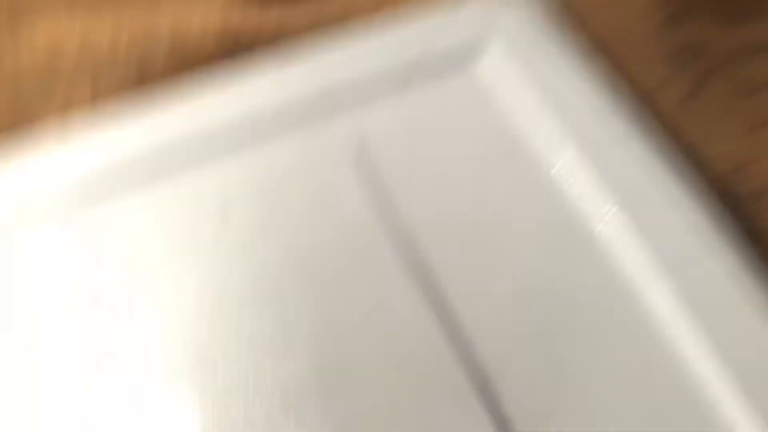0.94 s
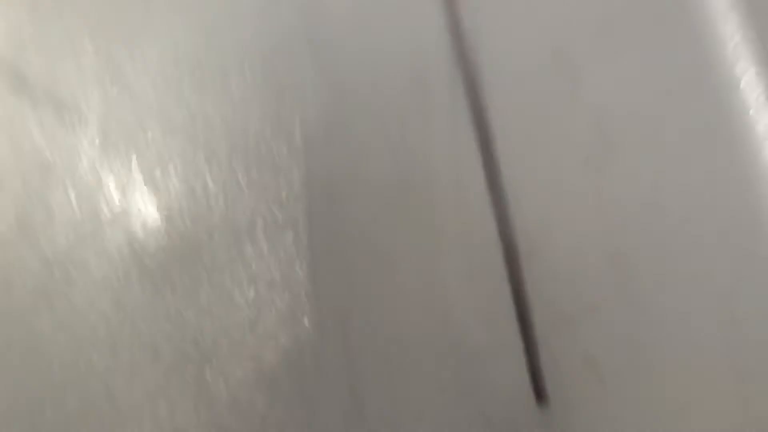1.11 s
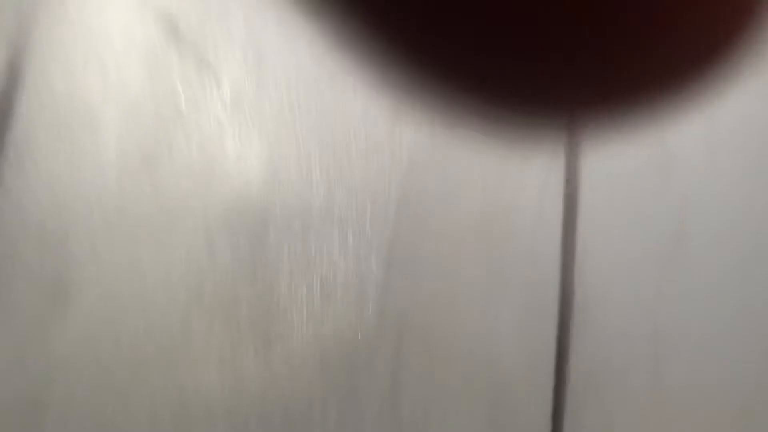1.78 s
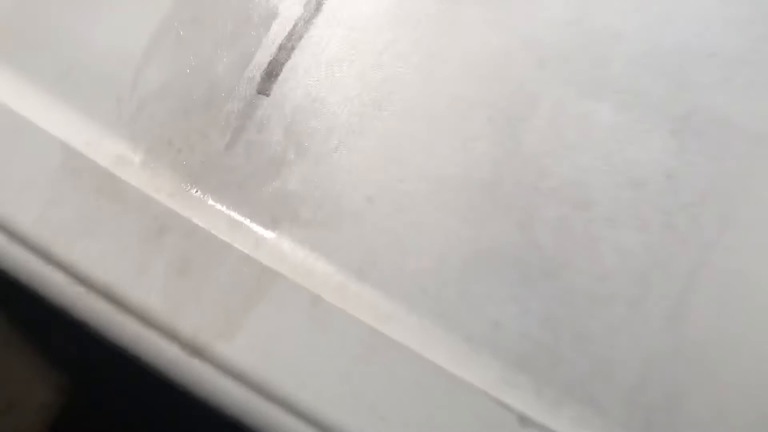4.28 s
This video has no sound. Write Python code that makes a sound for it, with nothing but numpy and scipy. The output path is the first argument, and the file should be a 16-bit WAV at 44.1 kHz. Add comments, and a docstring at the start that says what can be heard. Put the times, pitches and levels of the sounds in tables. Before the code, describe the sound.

Close up indoors, plastic clacks and soft cloth brushes give way to fast, hissing rag strokes on a rocking lid, ending in a knocking skid.

```python
"""Close to the microphone, a hand gathers a rag over a plastic lid lying loose on a wooden board; the lid knocks.
Light brushes of cloth follow, then a near-silence, and from 3.4 s the rag scrubs quickly back and forth.
Each stroke hisses as friction noise; the lid rocks, rings in short modes, rattles and skids, and the board booms.
Hard knocks and skids come early in the scrubbing, near 7.3 s and at its end; bending waves bring their treble
ahead of their bass. A small room of sparse echoes and a faint floor of steady noise lie behind throughout."""
import sys
import numpy as np
from scipy import signal
from scipy.io import wavfile
from scipy.ndimage import uniform_filter1d

SR = 44100
rng = np.random.default_rng(int(sys.argv[2]) if len(sys.argv) > 2 else 0)


def attenuation_scalar(level_db):
    """Turn a level in dB into a linear amplitude multiplier (20 dB per decade)."""
    decades = np.asarray(level_db, float) / 20
    return 10 ** decades


def put_to_file(sound):
    """Save the sound as 16-bit audio at rate SR, in the file named by the first command-line argument."""
    columns = np.atleast_2d(sound).T  # one column per channel
    safe = np.clip(columns, -1, 1)
    whole_steps = np.round(safe * 32767)
    wavfile.write(sys.argv[1], SR, whole_steps.astype(np.int16))


N = 348390

# where the rag turns round, each turn starting a stroke: start_s, gain_db
TURNS = [(3.402, -64), (3.576, -55.5), (3.725, -60.5), (3.897, -64), (4.05, -60), (4.201, -60.5),
         (4.338, -59), (4.486, -60.5), (4.626, -59.5), (4.763, -60.5), (4.897, -59.5), (5.035, -59.5),
         (5.153, -59), (5.297, -61), (5.421, -59), (5.562, -60.5), (5.679, -59), (5.818, -60),
         (5.942, -59.5), (6.062, -59.5), (6.202, -61), (6.329, -59), (6.506, -61.5), (6.633, -59.5),
         (6.772, -60), (6.924, -61), (7.063, -62.5), (7.223, -53.5), (7.377, -66), (7.542, -62.5),
         (7.701, -62)]
# light brushes of the rag before scrubbing: start_s, length_s, gain_db
BRUSHES = [(0.256, 0.045, -76.5), (0.422, 0.052, -68.5), (1.381, 0.022, -67), (1.729, 0.055, -62.5),
           (1.778, 0.067, -66.5), (1.845, 0.04, -61), (2.931, 0.0078, -67.5), (2.941, 0.12, -73)]
# gathering and shifting of the rag before scrubbing, a curve: time_s, gain_db
RUSTLE = [(0.0, -70), (0.12, -73.5), (0.28, -74.5), (0.48, -81.5), (0.72, -87), (0.85, -71.5), (0.95, -63),
          (1.19, -86), (1.31, -92), (1.51, -72), (1.7, -75), (2.06, -92), (2.7, -85.5), (3.0, -84),
          (3.2, -76.5), (3.4, -80)]
# spectrum of cloth fibres on smooth plastic: pitch_hz, relative density_db (per Hz)
CLOTH = [(200, -2.5), (500, -22.5), (1000, 1), (1750, -2.5), (2300, -7), (3000, -9.5), (4000, -10),
         (5200, -10.5), (5800, -18.5), (7500, -20), (9500, -26), (12000, -26.5), (13300, -32.5),
         (15500, -35.5)]
# lid against board: start_s, lid_peak_db, favoured pitch_hz, crack_gain_db, thump_peak_db
KNOCKS = [(0.219, -45, 397, -74, -38), (0.457, -38, 1870, -64, -52), (0.6805, -1, 1830, -10.5, -18),
          (0.806, -20, 1160, -51, -31), (0.841, -21, 1490, -50, -38), (0.901, -25.5, 650, -37.5, -62),
          (1.071, -4, 745, -22.5, -48), (1.082, -12, 855, -38, -51), (1.106, -8, 1260, -20, -36),
          (1.236, -14.5, 1180, -34, -48), (1.256, -12, 910, -58, -44), (1.307, -25, 686, -77, -74),
          (1.356, -24.5, 880, -66, -57), (1.442, -32.5, 710, -65, -69), (1.474, -32.5, 1130, -55, -50),
          (1.574, -31, 640, -52, -41), (1.677, -32, 650, -62, -58), (2.755, -44.5, 499, -84, -41),
          (3.228, -48, 750, -70, -41.5), (3.302, -34, 630, -70, -36), (3.322, -19.5, 717, -61, -28),
          (3.436, -30, 600, -47, -47), (3.602, -22, 715, -65, -51), (3.624, -12, 805, -60, -33),
          (3.675, -7, 1130, -32, -20.5), (3.681, -12.5, 890, -50, -21), (3.753, -18.5, 518, -75.5, -16.5),
          (3.918, -18, 513, -64.5, -17), (3.996, -30, 414, -64, -24.5), (4.038, -29, 387, -53, -25),
          (4.512, -33.5, 860, -44, -37.5), (4.781, -19.5, 860, -61, -33.5), (5.058, -33.5, 960, -59, -38),
          (5.087, -26.5, 842, -50, -38.5), (5.32, -31, 1270, -61, -35.5), (5.36, -22.5, 865, -58, -35.5),
          (5.631, -23.5, 810, -52, -35.5), (5.826, -31, 690, -55, -64), (5.839, -18.5, 1130, -53.5, -25.5),
          (5.901, -15, 910, -50, -28), (6.044, -20.5, 1090, -64, -25), (6.073, -30, 650, -68, -43),
          (6.09, -19.5, 1190, -36, -28.5), (6.154, -24, 714, -52, -33.5), (6.166, -27.5, 756, -38, -50),
          (6.389, -20, 810, -41, -34.5), (6.497, -26, 810, -38, -31.5), (6.725, -30, 430, -58, -25.5),
          (7.068, -32.5, 396, -70, -35), (7.237, -25, 1110, -38, -26.5), (7.305, -15, 1310, -32, -43),
          (7.313, -2.5, 960, -20.5, -14), (7.327, -4.5, 950, -39, -20), (7.506, -35.5, 710, -73, -64),
          (7.644, -16.5, 980, -31, -29.5), (7.679, -19.5, 744, -60, -24),
          (7.696, -18.5, 1710, -20.5, -22.5), (7.71, -9, 1590, -22, -26), (7.747, -7, 1770, -14.5, -49),
          (7.778, -6.5, 1310, -39, -12), (7.782, -6.5, 537, -39, -9), (7.789, -7, 490, -66, -33),
          (7.815, -20, 510, -64, -10), (7.843, -23, 464, -51, -15.5), (7.87, -29, 427, -61, -17.5)]
# the lid skids over the board, chattering: start_s, length_s, level_db (rms), favoured pitch_hz
SKIDS = [(0, 0.14, -52.5, 680), (1.716, 0.063, -55.5, 2750), (2.958, 0.014, -60, 4000),
         (3.58, 0.022, -39, 800), (3.598, 0.052, -25.5, 780), (3.618, 0.054, -24, 1250),
         (4.016, 0.089, -45, 1420), (6.474, 0.032, -39.5, 1050), (6.653, 0.04, -42.5, 1120),
         (6.946, 0.022, -42.5, 1150), (7.078, 0.022, -40.5, 1100), (7.278, 0.035, -25, 1050),
         (7.316, 0.025, -19.5, 1210), (7.691, 0.044, -25.5, 1400), (7.722, 0.14, -31.5, 527)]
# the lid shifts under the hand, two curves: time_s, lid_skid_db, board_shake_db
SHIFT = [(0.0, -56.5, -63), (0.45, -64.5, -56), (0.56, -80, -77), (0.66, -80, -77), (0.86, -40, -40),
         (0.99, -48.5, -47.5), (1.21, -53, -42), (1.3, -63, -45), (1.75, -59, -55), (1.95, -70, -68.5),
         (2.68, -73, -70), (2.8, -62, -65), (3.28, -54, -54), (3.45, -50, -48), (4.2, -62, -52),
         (5.8, -64, -57), (7.2, -62, -50), (7.54, -59, -60), (7.7, -44, -45), (7.9, -42, -40)]
# the hand shoves the lid and the board booms: peak_s, level_db, fade t60_s
SHOVES = [(0.37, -46, .4), (0.71, -31, .6), (0.84, -33, .4), (1.14, -27, .3), (1.27, -33, .6),
          (1.69, -46, .5), (3.35, -38, .5), (3.705, -23.5, .4), (3.94, -28, .4), (4.07, -27, .3),
          (4.64, -42, .4), (4.8, -41, .6), (5.1, -45, .6), (5.37, -42, .6), (5.64, -45, .6),
          (5.86, -37, .8), (6.11, -35, .7), (6.4, -43, .4), (6.52, -33, .4), (6.75, -33, .5),
          (6.98, -38, .4), (7.11, -34, .5), (7.29, -26, .4), (7.38, -20, .3), (7.71, -31, .5),
          (7.8, -23, .5), (7.86, -25, .6)]
# modes of the lid, before each contact weights them: nominal pitch_hz, relative level_db, base t60_s
LID = [(397, -3, 0.018), (482.7, -6, 0.033), (604, 6, 0.011), (714, 6, 0.019), (810, 10, 0.017),
       (958, 10, 0.017), (1100, 13.5, 0.0095), (1368, 1, 0.02), (1632, 13, 0.0093), (1769, 4.5, 0.013),
       (2090, 3.5, 0.021), (2294, 6.5, 0.01), (2750, -9, 0.039), (3300, 10.5, 0.0035), (3810, -6, 0.016),
       (4540, -2.5, 0.0053), (5600, -16.5, .012)]
# modes of the board, before each contact weights them: nominal pitch_hz, relative level_db, t60_s
BOARD = [(67.8, 3, 0.18), (85.3, -4, 0.24), (115.6, -4.5, 0.22), (164.4, -0.5, 0.073), (234.5, -2.5, 0.097),
         (265.5, -0.5, 0.062), (340.7, -4, 0.068)]
# thin bright ticks of the rim: start_s, gain_db
TICKS = [(3.671, -36.5), (6.091, -56), (6.87, -52), (6.972, -64), (7.64, -43.5), (7.695, -35), (7.711, -39),
         (7.749, -31), (7.779, -39.5)]
# reverberation of the small room: pitch_hz, t60_s
ROOM = [(200, 0.45), (1000, 0.35), (3000, 0.38), (8000, 0.3)]
# spectrum of the noise floor: pitch_hz, relative density_db (per Hz)
FLOOR = [(30, 1), (64, -9), (200, 1.5), (600, -7), (2150, -19.5), (3500, -21.5), (6000, -26), (10000, -30),
         (15500, -37)]


def evened(x):
    """Scales to rms 1."""
    return x / np.sqrt(np.mean(x ** 2) + 1e-20)


def read(points, hz):
    """Reads a spectrum on a log-frequency axis."""
    f, value = np.transpose(points)
    return np.interp(np.log(hz + 1), np.log(f + 1), value)


def curve(rows, column):
    """One column of a table, interpolated at every sample."""
    rows = np.array(rows)
    return np.interp(np.arange(N) / SR, rows[:, 0], rows[:, column])


def add(mix, start_s, sound):
    """Mixes a sound in at its time."""
    part = mix[max(round(start_s * SR), 0):][:len(sound)]
    part += sound[:len(part)]


def band(x, lo_hz, hi_hz):
    """Band-pass."""
    return signal.sosfilt(signal.butter(2, [lo_hz, hi_hz], "bandpass", fs=SR, output="sos"), x)


def hiss(spectrum, patchy_db, size):
    """Noise from random short-time spectra, with patches that drift over time and pitch."""
    hz = np.fft.rfftfreq(size, 1 / SR)
    real, imaginary, patches = rng.standard_normal((4 * N // size + 5, len(hz), 3)).T
    patches = uniform_filter1d(patches, size=3, axis=0)
    patches = evened(uniform_filter1d(patches, size=24, axis=1))
    spectra = (real + 1j * imaginary) * attenuation_scalar(read(spectrum, hz)[:, None] + patchy_db * patches)
    return signal.istft(spectra, nperseg=size, noverlap=3 * size // 4)[1][:N]


def rag():
    """Friction follows the speed of the rag: it dies at each turn, and the weave sings higher in mid-stroke."""
    pressure, speed, back = strokes()
    fibres = hiss(CLOTH, patchy_db=1.8, size=256)
    loose = 2.0 * signal.lfilter([0.3], [1, -0.7], fibres)  # gathered cloth sounds duller and plainer
    fibres += weave(fibres, speed, back)
    fibres += panel(fibres, back)
    grain_s, grain_db = 0.002, 2.5  # coarse threads catch
    grain = uniform_filter1d(rng.standard_normal(N), size=round(grain_s * SR))
    fibres *= attenuation_scalar(grain_db * evened(grain))
    level = np.std(band(fibres, 5000, 13000))
    air = band(fibres, 2200, 21000)
    rubbed = fibres - air + air * np.clip(speed, 0, 1) ** 0.4  # the treble grows faster with speed
    before_scrub = np.arange(N) < RUSTLE[-1][0] * SR
    rustle = attenuation_scalar(curve(RUSTLE, column=1)) * before_scrub
    return (rubbed * pressure + loose * rustle * uneven()) / level


def weave(fibres, speed, back):
    """Threads pass at a rate set by speed, a moving resonance that sings lower on the way back."""
    rest_hz, rise_hz, back_rise, width_hz, gain = 1700, 2700, 0.68, 420, 2.2
    pitch_hz = rest_hz + rise_hz * speed * back_rise ** back
    turn = np.exp(2j * np.pi * np.cumsum(pitch_hz) / SR)
    r = np.exp(-np.pi * width_hz / SR)
    shifted_down = signal.lfilter([1 - r], [1, -r], fibres / turn)
    return gain * (turn * shifted_down).real


def panel(fibres, back):
    """The flat of the lid sings under the rag as a fixed resonance, louder on the way back."""
    pitch_hz, width_hz, gain, back_db = 1828, 230, 0.64, 6
    r = np.exp(-np.pi * width_hz / SR)
    poles = [1, -2 * r * np.cos(2 * np.pi * pitch_hz / SR), r * r]
    return gain * attenuation_scalar(back_db * back) * signal.lfilter([1 - r, 0, r - 1], poles, fibres)


def strokes():
    """Pressure, speed and direction of the rag: each stroke runs from one turn to the next, dies at both."""
    scrub_end_s, lead_s, pause_s = 7.9, 0.014, 0.017  # start after the turn; whole rest around a turn
    skew, roundness = 0.9, 0.42  # fastest slightly early; below 1, pressure swells sooner than speed
    slope_db, speed_spread = -0.5, 0.22  # change of pressure along a stroke; strokes are unequally fast
    pressure, speed, back = np.zeros((3, N))
    ends = [s for s, _ in TURNS[1:]] + [scrub_end_s]
    scrub = [(s + lead_s, end - s - pause_s, db) for (s, db), end in zip(TURNS, ends)]
    for start_s, length_s, gain_db in BRUSHES + scrub:
        u = np.linspace(0, 1, round(length_s * SR))
        arch = abs(np.sin(np.pi * u ** skew))
        add(speed, start_s, arch * (1 - speed_spread * rng.random()))
        add(pressure, start_s, arch ** roundness * attenuation_scalar(gain_db + slope_db * (u - 2.5)))
    for start_s, length_s, _ in scrub[::2]:
        add(back, start_s, np.ones(round(length_s * SR)))
    return pressure, speed, back


def uneven():
    """Handling is never steady: a random gain that wanders within a few hundredths of a second."""
    size = round(0.03 * SR)
    wander = uniform_filter1d(rng.standard_normal(N), size=size)
    return attenuation_scalar(2.5 * evened(uniform_filter1d(wander, size=size)))


def knocks():
    """Each blow: a crack, the lid's short ring around the favoured pitch, and the board's thump."""
    out, t = np.zeros(N), np.arange(SR // 8) / SR
    wobbles = rng.uniform(0.887, 1.116, (len(KNOCKS), len(LID)))  # detunes the modes from blow to blow
    noises = rng.standard_normal((len(KNOCKS), len(t)))
    for (start_s, lid_db, hz, crack_db, thump_db), wobble, noise in zip(KNOCKS, wobbles, noises):
        lasting = (800 / hz) ** 0.48  # brighter, harder blows die sooner
        lid = ring(LID, hz, 0.43 * (hz / 800) ** 0.55, 0.00074, wobble, lasting)
        board = ring(BOARD, 276, 0.61, 0.0017, wobble)
        snap = noise * (np.exp(-t / 0.0046) + 0.22 * np.exp(-t / 0.026))
        crack = band(snap, 1800, max(2.44 * hz, 4400))
        crack = band(crack, 1000, 4300) + 0.006 * snap
        add(out, start_s - 0.0006, attenuation_scalar(lid_db) * lid / abs(lid).max())
        add(out, start_s, attenuation_scalar(thump_db) * board / abs(board).max())
        add(out, start_s - 0.0003, attenuation_scalar(crack_db) * crack)
    return out


def ring(modes, hz, spread, lag_s, wobble, lasting=1):
    """Modes near hz ring most; lower ones arrive later and swell more slowly, as bending waves do."""
    f, db, t60 = np.transpose(modes)[:, :, None]
    t60 = t60 * lasting
    t = np.arange(round(2 * t60.max() * SR)) / SR
    late = np.maximum(t - lag_s * np.sqrt(1000 / f), 0)
    steepness = np.where(f > hz, 2.4, 1.1)  # a soft contact cannot drive high modes
    weight = attenuation_scalar(db) / (1 + (np.log(f / hz) / spread) ** 2) ** steepness
    swell = (1 - np.exp(-late * f / 1.3)) * attenuation_scalar(-60 * late / t60)
    tone = np.sin(2 * np.pi * f * wobble[:len(f), None] * late)
    return (weight * swell * tone).sum(0)


def shifting():
    """Catches of the rim ring the lid, densely when it skids; slower shoves shake the board."""
    steady, rim = np.ones(len(LID)), slips(1200, 2.7)
    catches = signal.oaconvolve(rim, ring(LID, 550, 1.0, 0.00061, steady))[:N]
    shaking = signal.oaconvolve(slips(400, 3.6), ring(BOARD, 89, 1.64, 0.00082, steady))[:N]
    chips = signal.oaconvolve(slips(700, 3.0), ring(LID, 1000, 1.5, 0.0006, steady))[:N]  # fewer, harder bounces
    pressure, _, back = strokes()
    drag_db = 3 - 4 * back  # skid relative to stroke pressure; the rim skids less on the way back
    drag = attenuation_scalar(curve(SHIFT, column=1)) * uneven() + attenuation_scalar(drag_db) * pressure
    out = drag * evened(catches) + rattle() * evened(chips) + shake() * evened(shaking)
    return out + skids(rim, steady)


def slips(per_s, spread_db):
    """Tiny random catches of one surface on another; a few are large."""
    sizes = attenuation_scalar(spread_db * np.minimum(rng.exponential(1, N), 4)) * rng.choice([-1., 1.], N)
    return sizes * (rng.random(N) < per_s / SR)


def rattle():
    """Level of the loose lid rattling on after each blow: a quick rise, then a fade."""
    level, t = np.zeros(N), np.arange(SR // 4) / SR
    rise_s, t60_s, below_knock_db = 0.004, 0.19, 24
    rise = np.sin(np.pi / 2 * np.minimum(t / rise_s, 1)) ** 2
    for start_s, lid_db, *_ in KNOCKS:
        add(level, start_s + 0.001, attenuation_scalar(lid_db - below_knock_db - 60 * t / t60_s) * rise)
    return level


def shake():
    """Level of the board's shaking: the shifting hand plus shoves, each a quick swell and a slower fade."""
    level, now = attenuation_scalar(curve(SHIFT, column=2)), np.arange(N) / SR
    rise_db_per_s = 497.5
    for peak_s, level_db, t60_s in SHOVES:
        swell_db = rise_db_per_s * (now - peak_s)
        fade_db = 60 * (peak_s - now) / t60_s
        level = level + attenuation_scalar(level_db + np.minimum(swell_db, fade_db))
    return level


def skids(rim, steady):
    """Each skid is a stretch of rim catches that chatters in the lid modes near its pitch."""
    out = np.zeros(N)
    for start_s, length_s, level_db, hz in SKIDS:
        stretch = rim[round(start_s * SR):round((start_s + length_s) * SR)]
        faded = stretch * signal.windows.tukey(len(stretch), 0.25)
        chatter = signal.oaconvolve(faded, ring(LID, hz, 0.57, 0.00088, steady))
        add(out, start_s, attenuation_scalar(level_db) * chatter / np.std(chatter[:len(stretch)]))
    return out


def ticks():
    """Each tick of the rim is a short, decaying burst of bright noise."""
    out, t = np.zeros(N), np.arange(SR // 20) / SR
    for (start_s, gain_db), noise in zip(TICKS, rng.standard_normal((len(TICKS), len(t)))):
        add(out, start_s, attenuation_scalar(gain_db) * band(noise * np.exp(-t / 0.0034), 2860, 7770))
    return out


def room(x):
    """Sparse taps of random sign, each band dying at its own speed."""
    taps = np.zeros(SR // 2)
    at = np.arange(200, SR // 2 - 20, 20)
    taps[at + rng.integers(0, 20, len(at))] = rng.choice([-1., 1.], len(at))
    hz, t, spectra = signal.stft(taps, SR, nperseg=256)
    fade = attenuation_scalar(-60 * t / read(ROOM, hz)[:, None])
    tail = signal.istft(spectra * fade, SR, nperseg=256)[1]
    return signal.oaconvolve(x, tail / np.linalg.norm(tail))[:N]


def background():
    """The faint floor: noise of steady level, strongest in the bass, with slightly drifting patches."""
    return attenuation_scalar(-64) * evened(hiss(FLOOR, patchy_db=2.5, size=2048))


def scene():
    """Rag, lid and board close by, in the room, over the floor."""
    near = rag() + knocks() + shifting() + ticks()
    return (near + attenuation_scalar(-16) * room(near) + background())[None]


def top_cut(x):
    """Nothing passes above the cut-off."""
    return signal.sosfilt(signal.butter(12, 15760, fs=SR, output="sos"), x)


def record(dry):
    """The microphone loses the deepest bass, below about 45 Hz."""
    mix = signal.sosfilt(signal.butter(3, 45, "highpass", fs=SR, output="sos"), dry)
    return top_cut(mix)


dry = scene()
out = record(dry)
put_to_file(out)
```